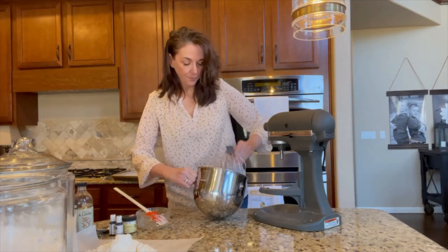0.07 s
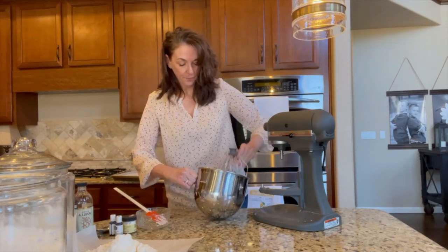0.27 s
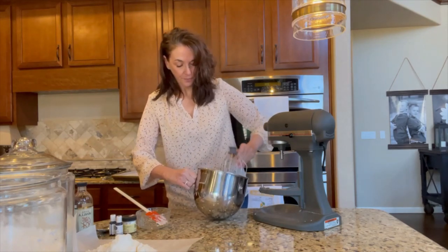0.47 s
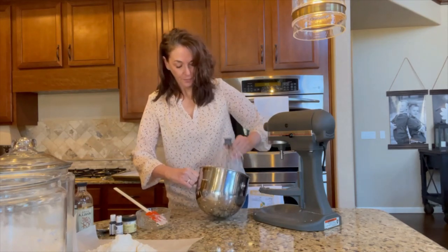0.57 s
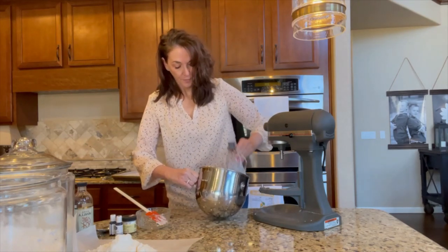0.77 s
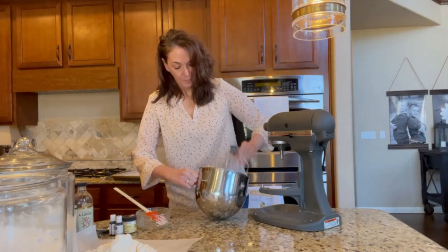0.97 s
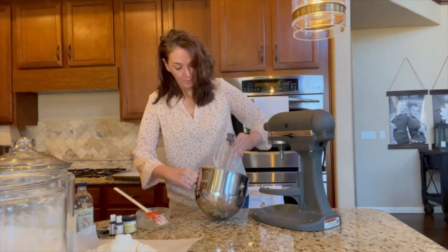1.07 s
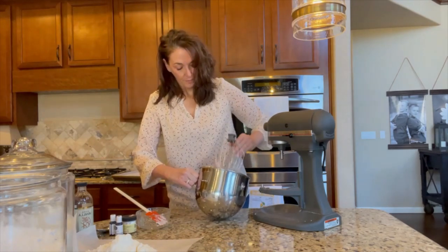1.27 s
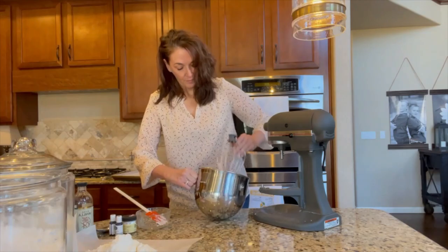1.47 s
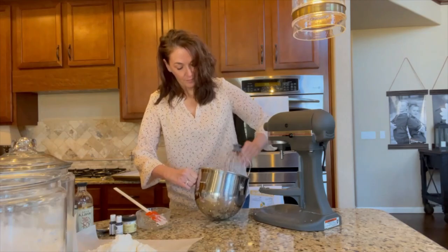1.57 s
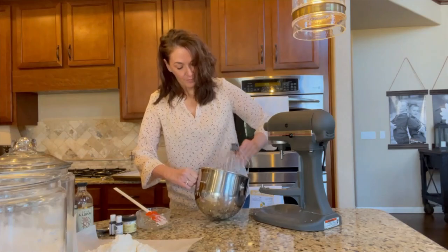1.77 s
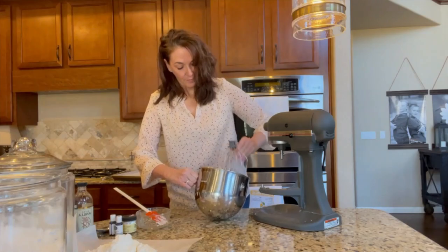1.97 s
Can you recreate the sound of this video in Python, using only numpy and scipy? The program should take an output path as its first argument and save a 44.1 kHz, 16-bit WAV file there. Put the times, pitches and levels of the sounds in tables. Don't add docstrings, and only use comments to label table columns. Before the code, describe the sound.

A wire whisk knocks ten times on the rim of a steel bowl in a kitchen

```python
import sys
import numpy as np
from scipy import signal
from scipy.fft import rfft, irfft
from scipy.io import wavfile

SR = 44100
rng = np.random.default_rng(int(sys.argv[2]) if len(sys.argv) > 2 else 0)


def boost_factor(decibels):
    exponent = np.asarray(decibels, float) / 20
    return 10 ** exponent


def output_pcm(signal):
    pcm = np.clip(np.atleast_2d(signal).T, -1, 1) * 32767
    wavfile.write(sys.argv[1], SR, np.round(pcm).astype(np.int16))


N = 88464

# (frequency [Hz], density [dB per Hz])
AIR = [(28, -7), (42, -2.5), (90, -5.5), (200, -12), (450, -16), (900, -33.5), (3000, -27.5), (9000, -42.5)]
# (frequency [Hz], peak level [dB])
HUM = [(59.5, -58), (299, -68.5), (380, -61)]
# (frequency [Hz], t60 [s], level [dB], left-right likeness [0-1])
KITCHEN = [(102, 0.45, -5.5, 0.6), (240, 0.27, -5.5, 0.75), (666, 0.44, -6, 0), (1700, 0.35, 2, 0),
           (5240, 0.42, -6.5, 0), (9700, 0.23, -6, 1), (16200, 0.25, -8.5, 0)]
# (frequency [Hz], level re counter push [dB], t60 [s])
COUNTER = [(144.7, -4.5, 0.32), (170.4, 3, .15), (208.4, 4, 0.14)]
# (frequency [Hz], density [dB per Hz])
CLICK = [(400, -78), (750, 12), (1500, -55.5), (2200, -2), (4300, -10), (7800, 2.5), (10500, 12.5),
         (15500, 10)]
# (frequency [Hz], width [Hz], level [dB], strongest at [s])
WHISK = [(3260, 12, -16, 0.84), (3770, 16, -16.5, 1.7), (4050, 13, -14, .2), (5000, 20, -10, 0.13)]
# (frequency [Hz], width [Hz], level [dB])
SHELL = [(1157, 64, -12.5), (1661.4, 57, -11), (2734, 28, -11), (2847, 71, -3.5), (3196, 59, -6),
         (3850, 142, 1), (4639, 160, 7), (4764, 102, -0.5), (5456, 360, 11.5), (6400, 157, 2.5),
         (7188, 128, 4.5), (7826, 313, 13.5), (8170, 98, -2.5), (8866, 290, 8)]
# (time [s], peak level [dB], thump pitch [Hz], thump re knock [dB], counter re knock [dB])
KNOCKS = [
    (0.0172, -9.5, 321.5, -17.5, -22),
    (0.2759, -11, 342.6, -17, -27.5),
    (0.4995, -8.5, 334, -16.5, -24),
    (0.7354, -9, 318, -15, -25),
    (0.9527, -7, 317, -16.5, -25.5),
    (1.1719, -7, 287, -21, -23),
    (1.3864, -7.5, 298.5, -18.5, -18.5),
    (1.5766, -6, 289.6, -17, -18),
    (1.7725, -6.5, 209.6, -19.5, -20),
    (1.948, -7.5, 310.6, -17, -24.5),
]
# (frequency [Hz], left over right [dB])
LEFT_DB = [(60, 2.5), (240, 4), (950, 2.5), (3770, 1.0), (15000, 1)]
# (frequency [Hz], left ahead of right [rad])
LEFT_LEADS = [(0, 0), (2150, .1), (3400, 1.5), (5300, 1.4), (7150, 0), (11200, -3.1), (14200, -6.0),
              (16400, -7.6)]

THUMP_LATE_S = 0.00328
LOWS_LATE_CYCLES = 4.0


def at_hz(points, hz, axis=1):
    points = np.array(points)
    return np.interp(np.log(hz + 1e-9), np.log(points[:, 0]), points[:, axis])


def bands():
    edges = 22 * 2 ** np.arange(0, 9.9, 0.5)
    return [(np.sqrt(low * high), signal.butter(2, [low, high], "band", fs=SR, output="sos"))
            for low, high in zip(edges, edges[1:])]


def pair(noise, alike):
    alike = np.clip(alike, 0, 1)
    middle = np.sqrt(1 + alike) * noise[0]
    side = np.sqrt(1 - alike) * noise[1]
    return middle + side * [[1], [-1]]


def ring(x, hz, width_hz):
    radius = np.exp(-np.pi * width_hz / SR)
    turn = 2 * np.pi * hz / SR
    return signal.lfilter([0, np.sin(turn)], [1, -2 * radius * np.cos(turn), radius ** 2], x + 1e-18)


def swell(hz, cycles):
    t = np.arange(SR // 4) / SR
    u = t * hz * np.log(1000) / cycles
    return u * np.exp(1 - u) * np.sin(2 * np.pi * hz * t)


def strike(at, size, hz, width_hz, db):
    size = size * rng.standard_normal(at.shape)
    net = np.abs(np.sum(size * np.exp(2j * np.pi * hz * at / SR), axis=1, keepdims=True))
    typical = np.sqrt(np.sum(size ** 2, axis=1, keepdims=True))
    struck = np.zeros(N + SR)
    late = int(LOWS_LATE_CYCLES * SR / hz)
    np.add.at(struck, at + late, size * boost_factor(db) / np.maximum(net, typical * 0.7))
    return ring(struck[:N], hz, width_hz)


def air():
    level_db, alike = -52.5, 0.76
    white = rng.standard_normal((2, 2, N + SR // 2))
    noise = 0
    for k, (hz, sos) in enumerate(bands()):
        noise = noise + boost_factor(at_hz(AIR, hz)) * pair(signal.sosfilt(sos, white[k % 2]), alike)
    noise = noise[:, -N:]
    hum = 0
    for hz, db in HUM:
        hum = hum + boost_factor(db) * np.sin(2 * np.pi * (hz * np.arange(N) / SR + rng.random()))
    return boost_factor(level_db) * noise / noise.std() + hum


def kitchen(x):
    level_db, build_s = -27, 0.004
    t = np.arange(int(0.7 * SR)) / SR
    white = rng.standard_normal((2, 2, len(t)))
    echo = 0
    for k, (hz, sos) in enumerate(bands()):
        fade = boost_factor(at_hz(KITCHEN, hz, axis=2) - 60 * t / at_hz(KITCHEN, hz))
        echo = echo + fade * pair(signal.sosfilt(sos, white[k % 2]), at_hz(KITCHEN, hz, axis=3))
    echo = echo * (1 - np.exp(-t / build_s))
    return boost_factor(level_db) * signal.fftconvolve(x[None], echo, axes=1)[:, :N]


def counter():
    level_db, push_s = 0.5, 0.0049
    push = np.zeros(N + SR)
    for s, db, _, _, counter_db in KNOCKS:
        push[int((s + THUMP_LATE_S) * SR)] = boost_factor(db + counter_db + level_db)
    soft = np.hanning(int(push_s * SR))
    push = np.convolve(push, soft / soft.sum())[:N]
    return sum(boost_factor(db) * ring(push, hz, np.log(1000) / np.pi / t60) for hz, db, t60 in COUNTER)


def hollow():
    thump_db, thump_cycles = 6, 7
    upper_hz, upper_db, upper_cycles = 504.3, 1, 10.7
    upper_late_s, upper_db_per_hz = 0.00385, 0.18
    out = np.zeros(N + SR)
    for s, db, hz, rel_db, _ in KNOCKS:
        i = int((s + THUMP_LATE_S) * SR)
        out[i:i + SR // 4] += boost_factor(db + rel_db + thump_db) * swell(hz, thump_cycles)
        j = i + int(upper_late_s * SR)
        tilt_db = upper_db_per_hz * (hz - 342)
        out[j:j + SR // 4] += boost_factor(db + rel_db + upper_db + tilt_db) * swell(upper_hz, upper_cycles)
    return out[:N]


def thump():
    bass_cut = signal.butter(4, 131, "high", fs=SR, output="sos")
    return signal.sosfilt(bass_cut, hollow() + counter() + 1e-18)


def wires():
    rattle_s, clump_s, rise_s, t60_s = 0.034, 0.0014, 0.0014, 0.095
    bounce_s, bounce_db, bounce_width_s = 0.011, 0, 0.0026
    lead_s, spread_db = 0.0026, 3.2
    s, db = np.transpose(KNOCKS)[:2, :, None]
    clump = rattle_s * ((np.arange(20) + rng.random((len(KNOCKS), 20))) / 20) ** 1.3
    late = np.repeat(clump, 8, axis=1) + clump_s * rng.random((len(KNOCKS), 160))
    chance = np.repeat(rng.standard_normal(clump.shape), 8, axis=1)
    rebound_db = bounce_db * np.exp(-((late - bounce_s) / bounce_width_s) ** 2)
    rise = 1 - np.exp(-(late / rise_s) ** 2)
    size = boost_factor(db - 60 * late / t60_s + rebound_db + spread_db * chance) * rise
    at = ((s - lead_s + late) * SR).astype(int)
    return at, size * rng.choice([-1, 1], late.shape)


def wire_clicks(at, size):
    level_db = -10
    clicks, out = np.zeros(N + SR), 0
    np.add.at(clicks, at, size)
    for k, (hz, sos) in enumerate(bands()):
        late = int(LOWS_LATE_CYCLES * SR / max(hz, 1000))
        band = signal.sosfilt(sos, np.roll(clicks, late)[:N] + 1e-18)
        out = out + boost_factor(level_db + at_hz(CLICK, hz)) * (-1) ** k * band
    return out


def ring_db():
    return np.transpose(KNOCKS)[1, :, None] - 10.5


def whisk_rings(at, size):
    turn_db_per_s = 7
    s = np.transpose(KNOCKS)[0, :, None]
    out = 0
    for hz, width_hz, db, best_s in WHISK:
        out = out + strike(at, size, hz, width_hz, ring_db() + db - turn_db_per_s * abs(s - best_s))
    return out


def shell_clang(at, size):
    widen, spread_db = 1.2, 1.5
    out = 0
    for hz, width_hz, db in SHELL:
        chance_db = spread_db * rng.standard_normal((len(KNOCKS), 1))
        out = out + strike(at, size, hz, width_hz * widen, ring_db() + db + chance_db)
    return out


def scene():
    at, size = wires()
    clang = shell_clang(at, size)
    rest = whisk_rings(at, size) + wire_clicks(at, size) + thump()
    to_room = boost_factor(-7) * clang + rest
    return air() + kitchen(to_room) + rest + clang


def band_limit(x):
    return signal.sosfilt(signal.butter(12, 16820, fs=SR, output="sos"), x)


def record(dry):
    cutoff_hz, top = 16700, 0.95
    hz = np.fft.rfftfreq(2 * N, 1 / SR)
    lead = np.interp(hz, *np.transpose(LEFT_LEADS))
    half = boost_factor(at_hz(LEFT_DB, hz) / 2) * np.exp(0.5j * lead)
    x = irfft(rfft(dry, 2 * N) * np.array([half, 1 / half]))[:, :N]
    x = top * np.tanh(x / top)
    x = signal.sosfilt(signal.cheby2(12, 70, cutoff_hz, fs=SR, output="sos"), x)
    return band_limit(x)


dry = scene()
out = record(dry)
output_pcm(out)
```